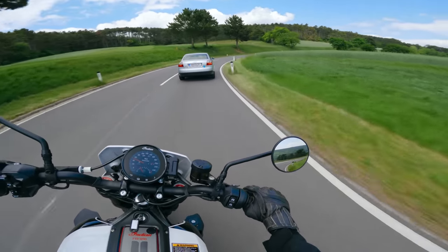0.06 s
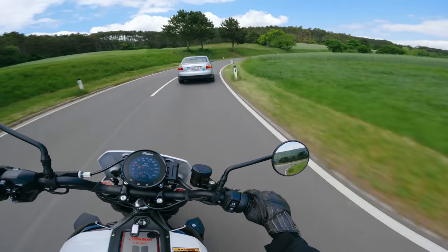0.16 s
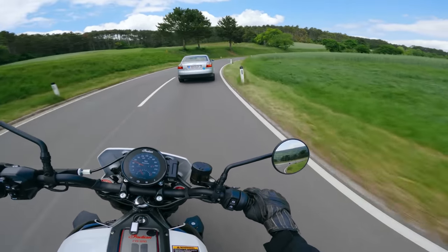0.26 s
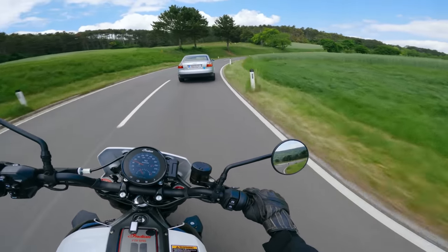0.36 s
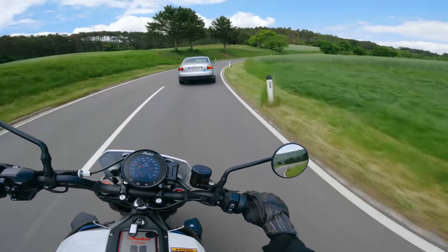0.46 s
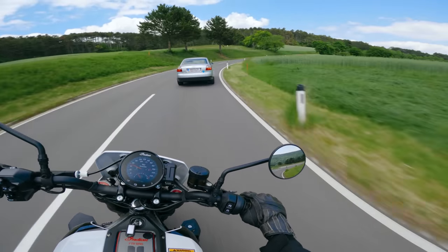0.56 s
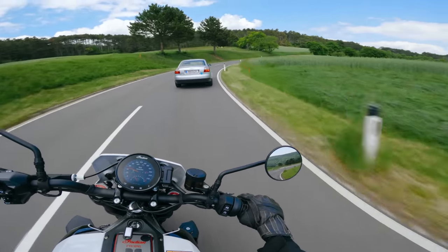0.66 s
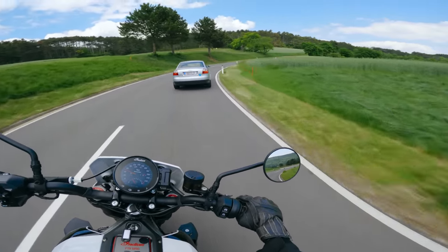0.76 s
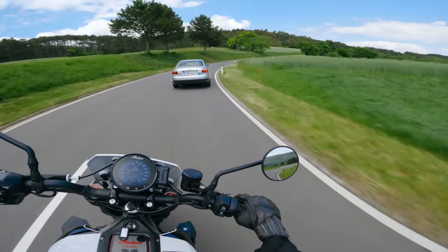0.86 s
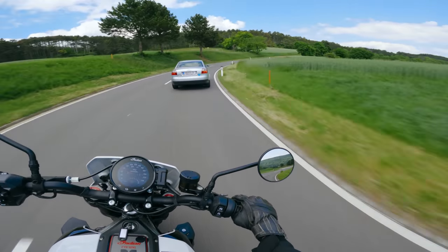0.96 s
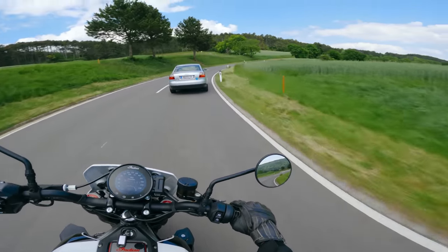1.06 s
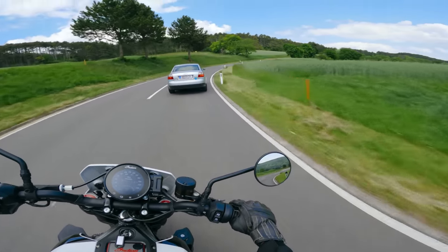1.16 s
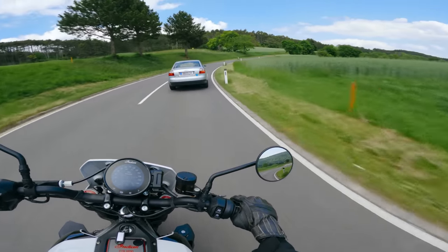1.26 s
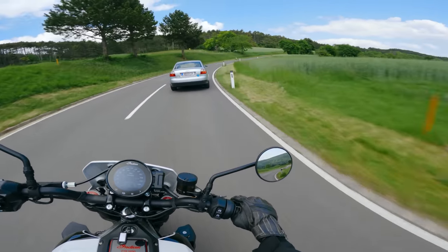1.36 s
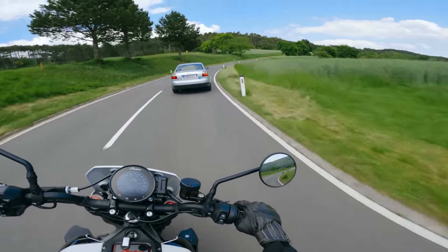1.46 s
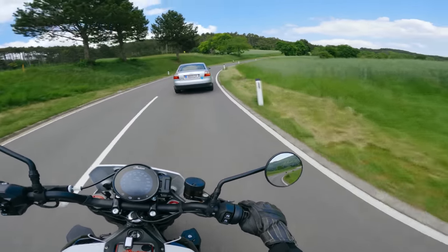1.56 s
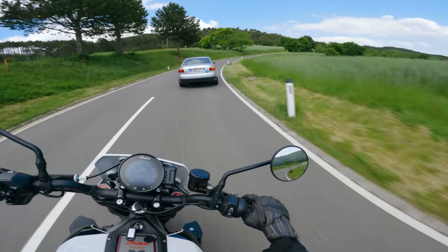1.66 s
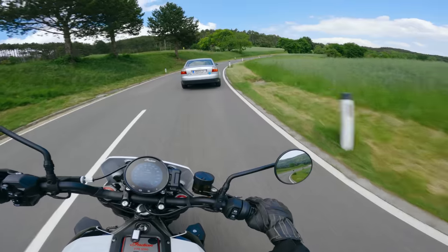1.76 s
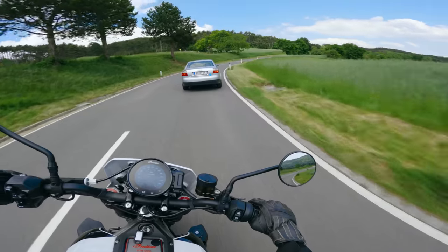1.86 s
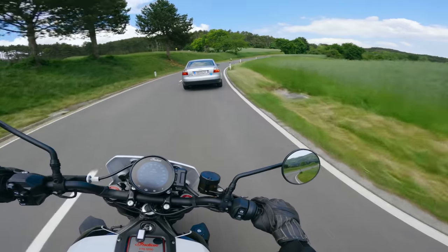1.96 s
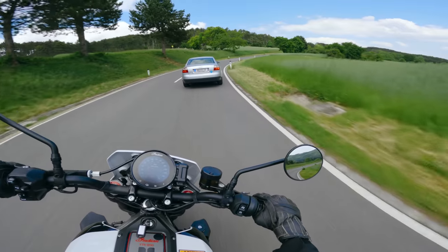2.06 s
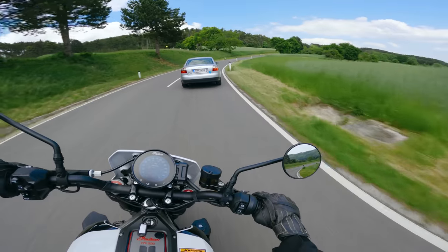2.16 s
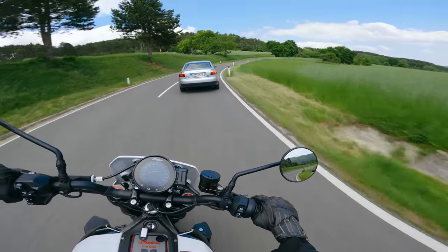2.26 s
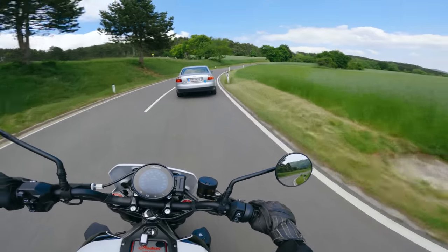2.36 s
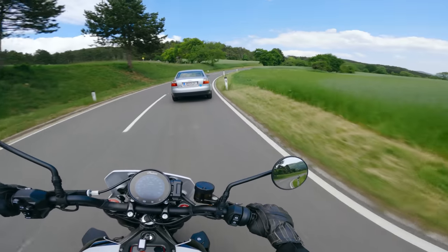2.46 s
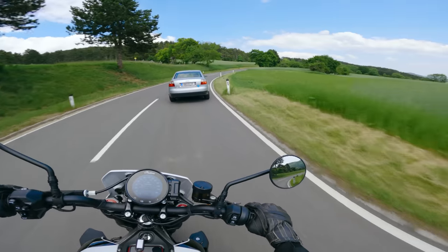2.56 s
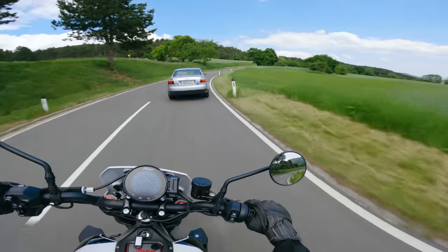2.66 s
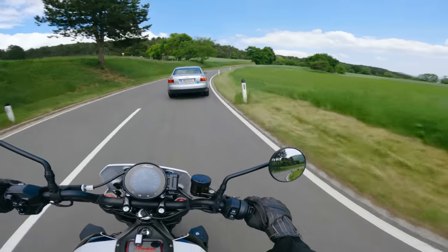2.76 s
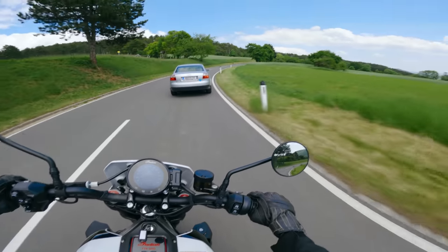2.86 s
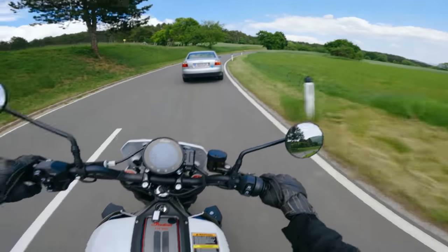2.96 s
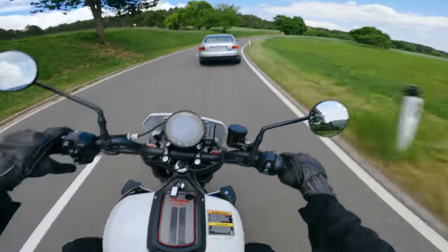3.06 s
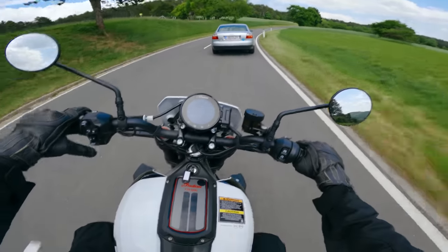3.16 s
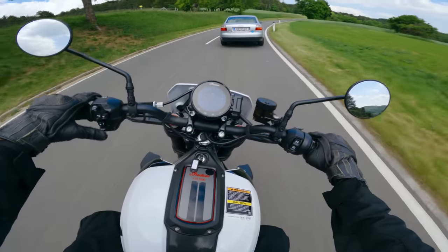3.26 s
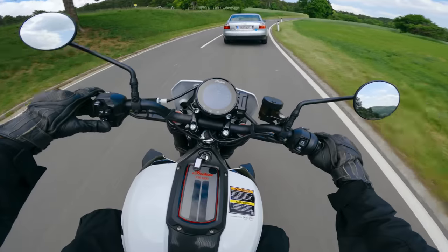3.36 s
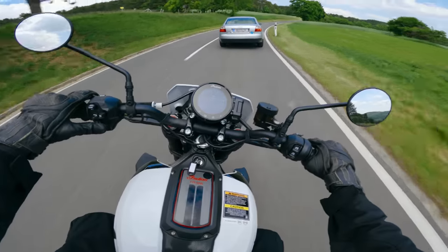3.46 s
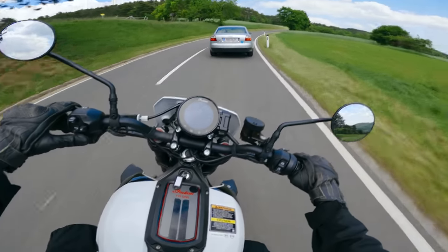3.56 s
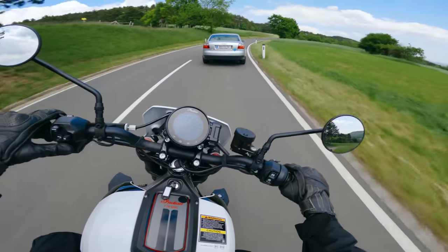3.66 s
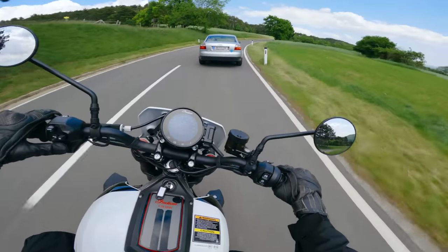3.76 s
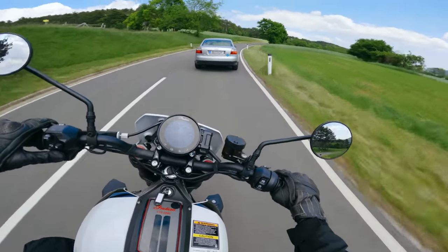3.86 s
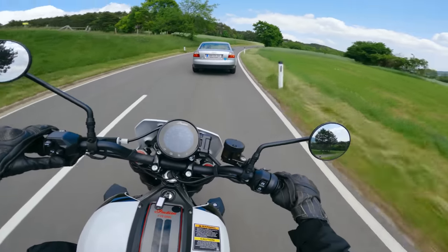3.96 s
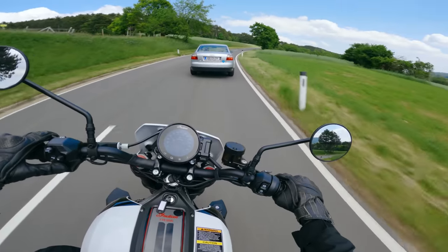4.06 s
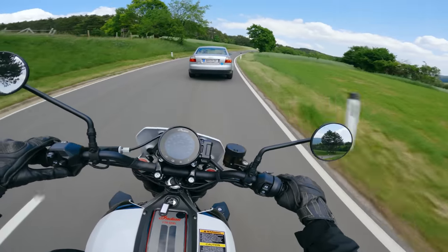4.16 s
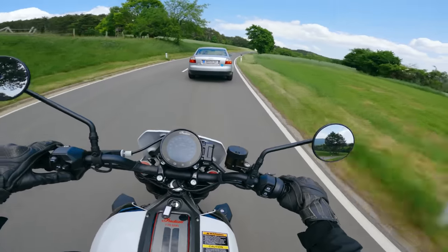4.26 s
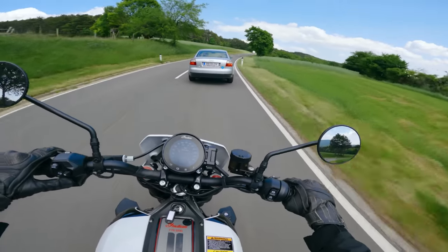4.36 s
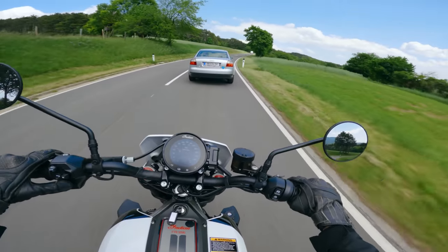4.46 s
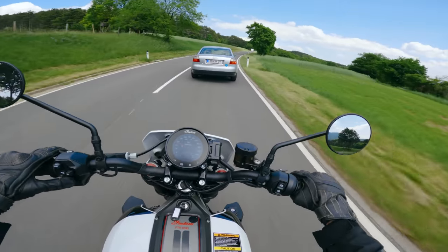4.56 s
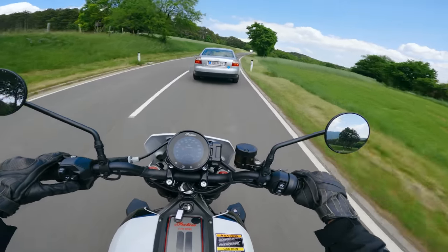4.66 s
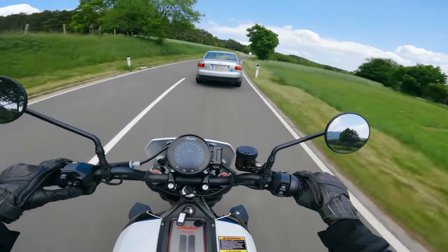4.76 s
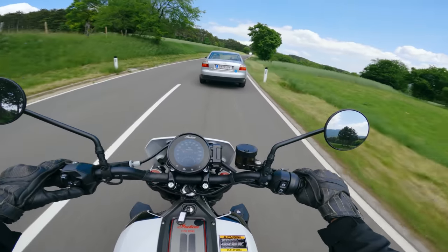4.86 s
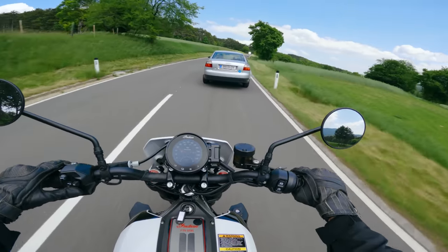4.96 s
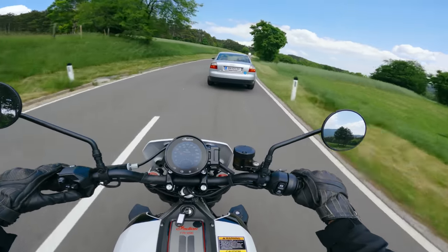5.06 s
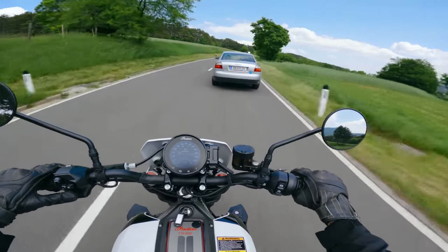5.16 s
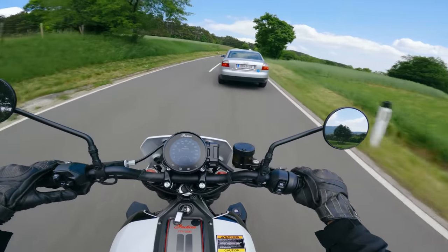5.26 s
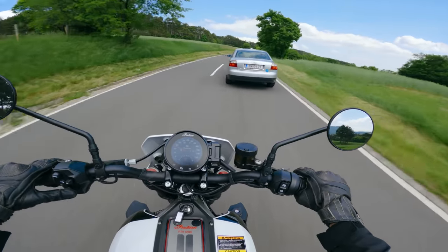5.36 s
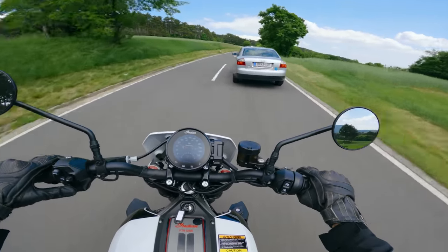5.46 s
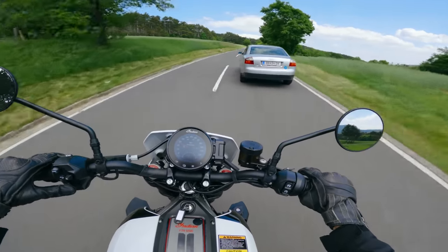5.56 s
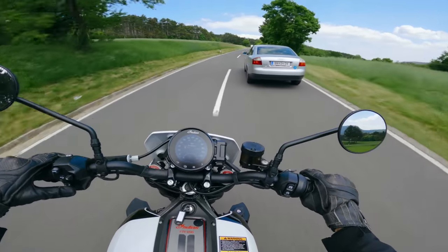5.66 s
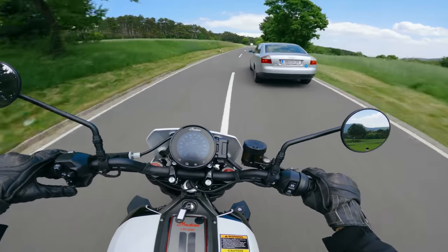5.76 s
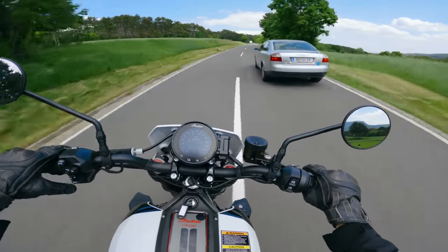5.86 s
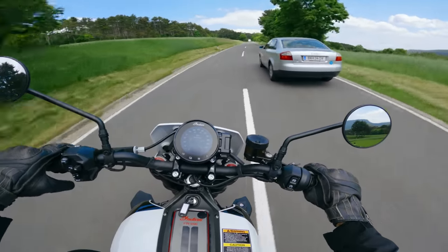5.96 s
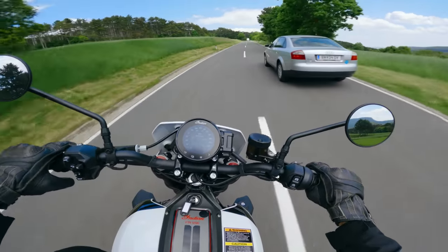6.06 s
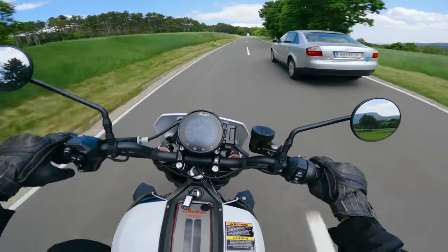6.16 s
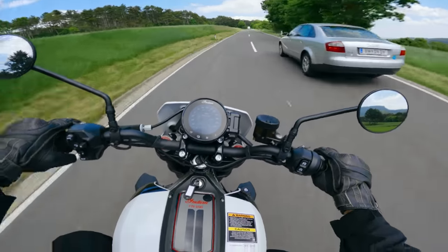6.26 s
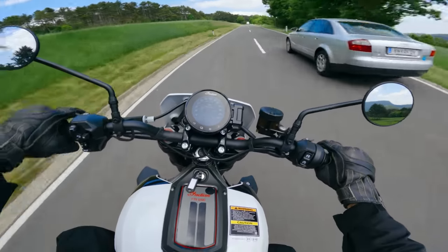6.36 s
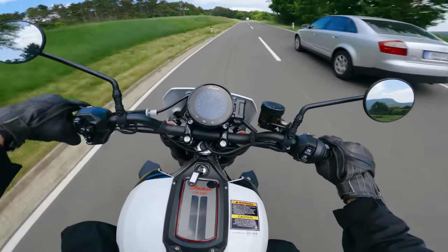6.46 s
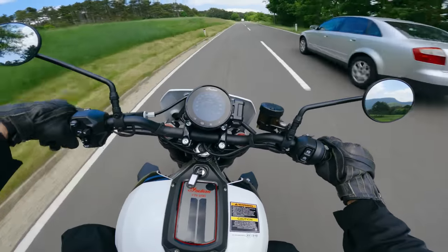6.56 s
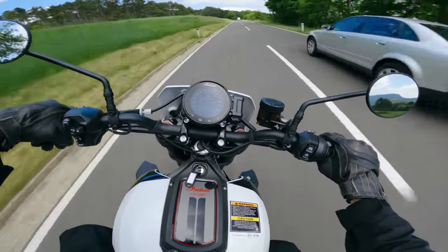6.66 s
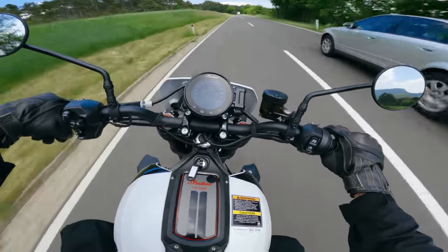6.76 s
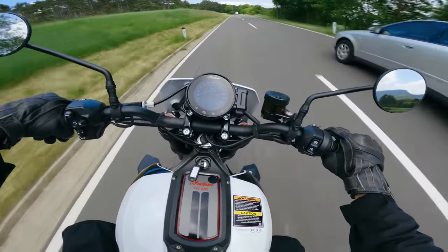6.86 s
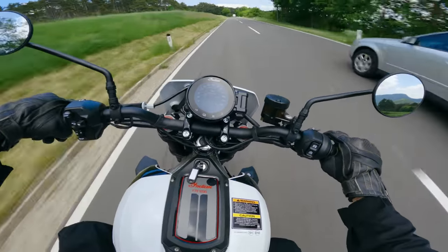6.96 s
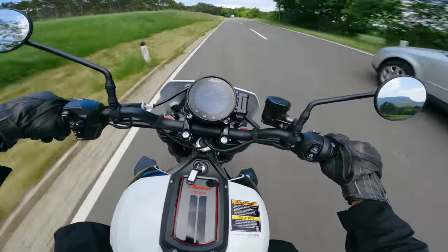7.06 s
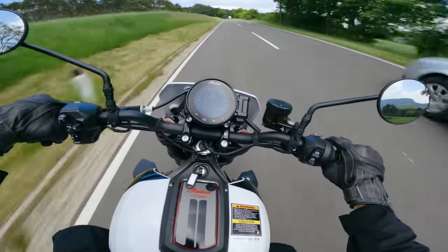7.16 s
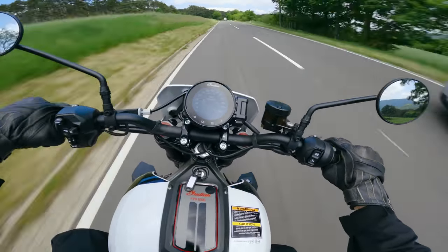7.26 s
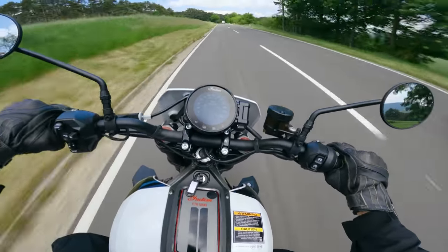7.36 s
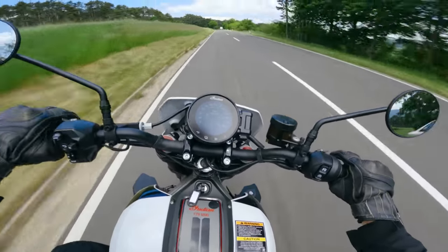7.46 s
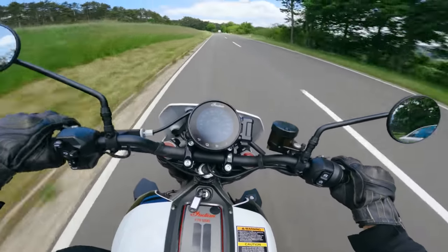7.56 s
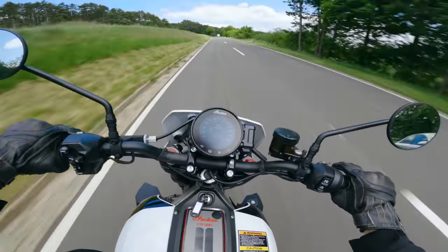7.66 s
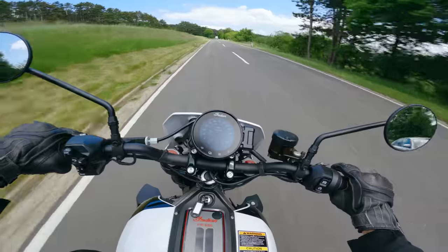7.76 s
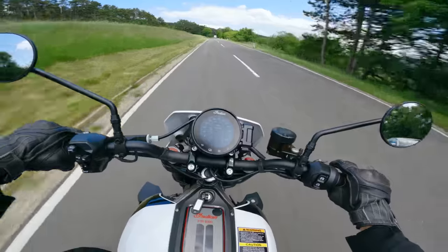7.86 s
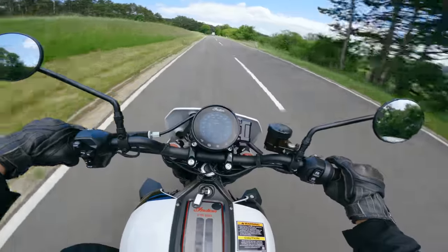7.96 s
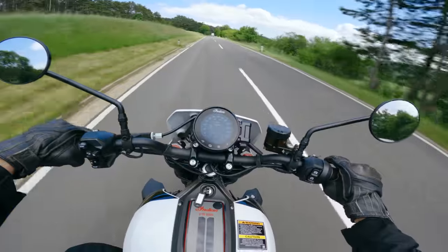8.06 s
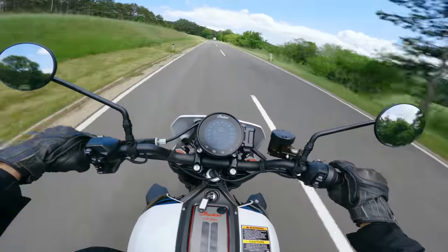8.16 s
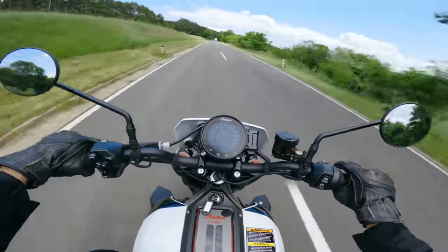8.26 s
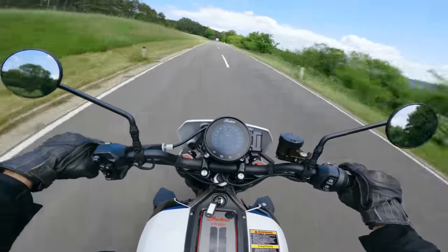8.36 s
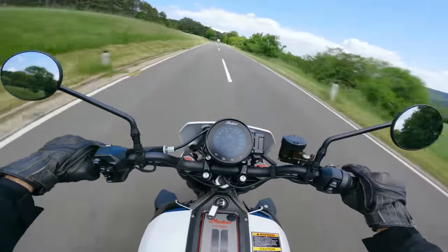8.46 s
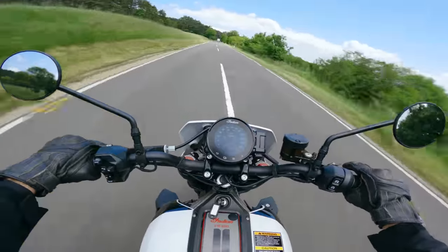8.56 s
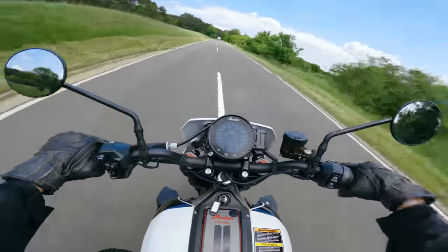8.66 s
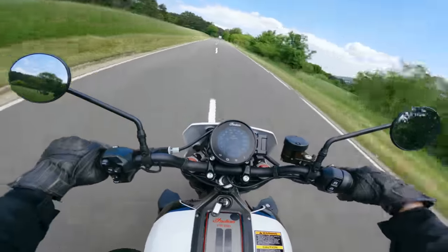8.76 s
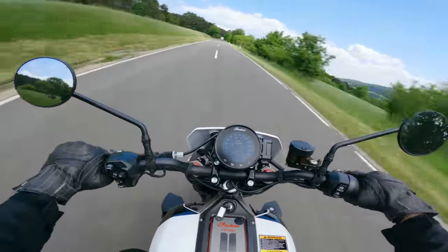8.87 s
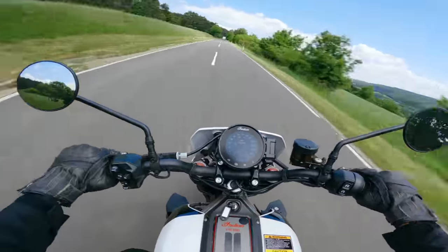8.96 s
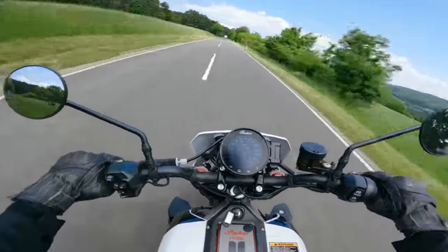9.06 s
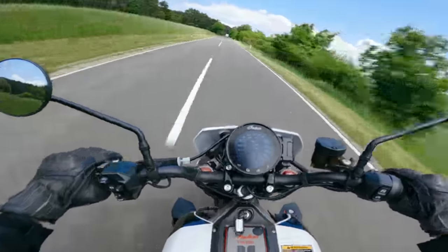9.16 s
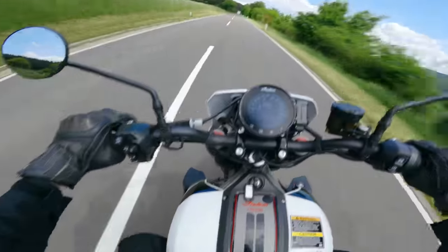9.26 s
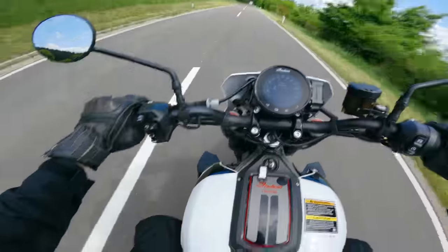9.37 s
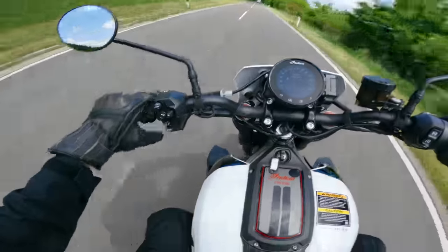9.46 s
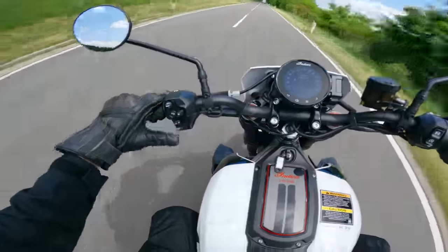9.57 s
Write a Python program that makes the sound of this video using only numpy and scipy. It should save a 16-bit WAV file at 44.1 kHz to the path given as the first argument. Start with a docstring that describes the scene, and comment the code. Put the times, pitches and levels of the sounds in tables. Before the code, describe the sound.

A steady, lumpy motorcycle engine hums and clatters on an open road, recorded on the bike, close and dry. After about five seconds it pulls, with tiny loose metal clinks, then a rising, rougher exhaust boom as it overtakes a car. Wind drops briefly alongside the car, then rumbles harder. Finally the power cuts, a dull gear-shift clunk lands, and the engine resumes at lower revs.

```python
"""A parallel-twin motorcycle is heard from the rider's chest: it cruises, pulls up through the revs and changes up.
Unevenly spaced firings boom in the pipes as sums of sine waves, and spit a short noisy rasp at wide throttle.
Ticks and gas noise ring the engine casings; gears whine, intake air whistles and a loose part clinks.
The gearbox knocks at the gear change, and wind noise buffets the microphone harder as the speed grows."""
import sys
import numpy as np
from scipy import signal
from scipy.fft import rfft, irfft
from scipy.io import wavfile
from scipy.ndimage import uniform_filter1d, minimum_filter1d

SR = 44100
rng = np.random.default_rng(int(sys.argv[2]) if len(sys.argv) > 2 else 0)


def put_to_file(sound):
    """Save the sound as 16-bit audio at rate SR, in the file named by the first command-line argument."""
    columns = np.atleast_2d(sound).T  # one column per channel
    safe = np.clip(columns, -1, 1)
    whole_steps = np.round(safe * 32767)
    wavfile.write(sys.argv[1], SR, whole_steps.astype(np.int16))


N = 424241
TIME = np.arange(N) / SR  # s
FREQ = np.maximum(np.fft.rfftfreq(N, 1 / SR), 1)  # Hz, kept above zero
SECOND_FIRING = 3 / 8  # share of a cycle between the cylinders of a 270 degree crank


def undb(db):
    """Turn decibels into gain."""
    return 10 ** (np.asarray(db) / 20)


def unit(x):
    """Scale a sound to a standard deviation of 1."""
    return x / np.std(x)


def curves(table):
    """Join the columns of a table by straight lines in time."""
    s, *columns = np.transpose(table)
    return [np.interp(TIME, s, column) for column in columns]


def colour(points):
    """Turn (frequency [Hz], level [dB]) points into a gain for every frequency."""
    hz, db = np.transpose(points)
    return undb(np.interp(np.log(FREQ), np.log(hz), db))


def resonance(hz, width):
    """Give the complex response of one resonance, 1 at its centre."""
    return 1 / (1 + 1j * (FREQ ** 2 - hz ** 2) / (FREQ * width))


def shape(x, response):
    """Filter a sound by a frequency response."""
    return irfft(rfft(x) * response, N)


def band_rms(x, lo, hi):
    """Measure the strength of a sound between two frequencies."""
    return np.std(shape(x, (FREQ > lo) & (FREQ < hi)))


def walk(rate):
    """Wander smoothly at random with spread 1, changing about rate times a second."""
    return unit(shape(rng.standard_normal(N), 1 / (1 + (FREQ / rate) ** 4)))


def blend(control, stops, values):
    """Crossfade between values as a control passes their stops."""
    weights = [np.interp(control, stops, row) for row in np.eye(len(stops))]
    return sum(weight * value for weight, value in zip(weights, values))


def dip(s, half_length):
    """Draw a smooth bell in time, 1 at its centre."""
    return np.exp(-((TIME - s) / half_length) ** 2)


def loading(throttle):
    """Load on the engine: 0 up to cruising, 1 when it pulls."""
    return np.interp(throttle, [.3, .7], [0, 1])


def loudness(law, hz, throttle):
    """Level in dB: it grows with the throttle and swells where the engine fills its cylinders best."""
    shut_db, open_db, peak_db, peak_hz, width_hz = law
    torque_peak = np.exp(-((hz - peak_hz) / width_hz) ** 2)
    return shut_db + open_db * throttle + peak_db * torque_peak


def after_firings(turns, length):
    """Jump up at both firings of each cycle and die away over length, a share of a cycle."""
    return sum(np.exp(-((turns - start) % 1) / length) for start in (0, SECOND_FIRING))


def order_gains(tone):
    """Gains of the first 21 multiples of the cycle rate, with unit power from the third up."""
    gains = undb(np.interp(np.arange(1, 22), *np.transpose(tone), right=-36))
    return gains / np.sqrt(np.sum(gains[2:] ** 2) / 2)


def exhaust(turns, hz, throttle, scatter_db=0.2, flutter=0.036, timing=0.003, pipe_hz=155, merge_hz=220,
            silencer_hz=112, silencer_width_hz=22, overtone_hz=345, idle_width_hz=45, load_width_hz=230):
    """Two uneven firings a cycle ring the pipes; load and revs decide which multiples come through."""
    # exhaust tone in each running state: (multiple of the cycle rate, relative level [dB])
    overrun = [(1, -12), (2, -1), (3, 1), (4, 5.5), (5, -15), (6, -18.5), (7, -12.5), (8, -4), (10, -14.5),
               (15, -27)]
    cruising = [(1, -40), (2, -18.5), (3, -12), (4, -5), (5, 2), (6, -11.5), (7, -0.5), (8, -13.5),
                (9, -17.5), (10, -21), (11, -26.5), (12, -14), (13, -16.5), (14, -13), (15, -19),
                (16, -23.5), (17, -18.5), (18, -22), (19, -24), (20, -33.5), (21, -30.5)]
    lugging_tone = [(1, -41.5), (2, -21.5), (3, -10.5), (4, -7.5), (5, 0), (6, -9.5), (7, -3), (8, -15),
                    (9, -4), (10, -10), (11, -7.5), (12, -1), (13, -15), (14, -8.5), (15, -12.5)]
    part_throttle = [(1, -22.5), (2, -15.5), (3, -16), (4, -9), (5, 3), (6, -16), (7, -13.5), (8, -10.5),
                     (9, -12), (10, -23.5), (11, -37), (12, -13.5), (13, -32), (14, -32.5), (15, -19.5)]
    low_revs = [(1, -34.5), (2, -6.5), (3, -6), (4, -23.5), (5, 1), (6, -11.5), (7, -32.5), (8, -16),
                (9, -15.5), (10, -9), (11, -16.5), (12, -20), (13, -18.5), (14, -22), (15, -25)]
    mid_revs = [(1, -35.5), (2, 1), (3, -1.5), (4, -5), (5, 6.5), (6, -48), (7, -7.5), (8, -4.5), (9, -5.5),
                (10, -3), (11, -11), (12, -5), (13, -42), (14, -11), (15, -26)]
    high_revs = [(1, -15), (2, 3.5), (3, -0.5), (4, 0.5), (5, -2.5), (6, -4), (7, 0.5), (8, -8), (9, -7.5),
                 (10, -35), (11, -9), (12, -15.5), (13, -19), (14, -24), (15, -23)]
    # cycle rates of lugging and part throttle: (rate [Hz])
    part_open_hz = [26.5, 38.4]
    # cycle rates of low, mid and high revs with the throttle wide open: (rate [Hz])
    wide_open_hz = [32.7, 38.4, 43.8]

    tones = (overrun, cruising, lugging_tone, part_throttle, low_revs, mid_revs, high_revs)
    states = [order_gains(tone) for tone in tones]
    turns = turns + timing * walk(10)  # no two burns are alike
    load = loading(throttle)
    # strong flow damps the pipe: throb turns into bark
    width = idle_width_hz + (load_width_hz - idle_width_hz) * load
    second_pulse = 0.75 + 0.23 * load
    out = 0
    for k, (shut, cruise, lugging, part, *wide) in enumerate(zip(*states), 1):
        order_hz = k * hz
        part_open = np.interp(hz, part_open_hz, [lugging, part])
        wide_open = np.interp(hz, wide_open_hz, wide)
        gain = blend(throttle, [0, .3, .7, 1], [shut, cruise, part_open, wide_open])
        pair = np.angle(1 + second_pulse * np.exp(-2j * np.pi * k * SECOND_FIRING))
        # at light load the two firings merge in the bass
        pair = pair * (1 - (1 - load) / (1 + (order_hz / merge_hz) ** 8))
        # the pipe resonance draws out each pulse
        lag = 2 * np.arctan((order_hz ** 2 - pipe_hz ** 2) / (order_hz * width))
        # at light load its overtone rings on too, and the silencer rounds it into one thump
        lag += (1 - load) * (np.pi + 2 * np.arctan((order_hz - overtone_hz) / idle_width_hz))
        lag += (1 - load) * 2 * np.arctan((order_hz - silencer_hz) / silencer_width_hz)
        wave = np.cos(2 * np.pi * k * turns + pair - lag)
        out = out - gain * (1 + flutter * walk(9.9)) * wave
    return out * undb(scatter_db * walk(39))


def firing_rasp(turns, throttle, rasp_hz=2550, width_hz=800, length=0.081, rasp_db=-2.5):
    """Every firing spits a short burst of noise, strongest with the throttle wide open."""
    bursts = after_firings(turns, length) * rng.standard_normal(N)
    rasp = unit(shape(bursts, resonance(rasp_hz, width_hz) ** 2))
    return rasp * throttle ** 3 * undb(rasp_db)


def valve_gear(turns, count=64, scatter_db=3, slop_s=.0001):
    """Ticks come at the same crank angles in every cycle, each a little different in size and timing."""
    cycles = np.arange(int(turns[-1]))[:, None]
    angles = (np.arange(count) + rng.random(count)) / count
    at = np.interp(cycles + angles, turns, TIME)
    at = at + slop_s * rng.standard_normal(at.shape)
    size = rng.choice([-1, 1], count) * undb(scatter_db * rng.standard_normal(at.shape))
    samples = np.clip(at * SR, 0, N - 1).astype(int)
    return unit(np.bincount(samples.ravel(), size.ravel(), N))


def clatter(turns, throttle, clatter_db, hiss_db, puff_length=0.21, idle_puff=0.42, load_puff=0.35,
            gas_db=0, spit_db=1.5, crack=0.56, crack_length=0.0091):
    """Ticks and gas noise swell after each firing and ring the casings; the open intake changes their colour."""
    # colour of the noise from the casings: (frequency [Hz], relative level [dB])
    casings = [(290, -26.5), (500, -1.5), (568, -7), (602, -8.5), (684, -4), (745, -10.5), (922, -2),
               (1050, -13), (1110, -8.5), (2170, -21), (2390, -22.5), (4050, -33), (4740, -32.5),
               (6570, -43), (15000, -61)]
    # its colour with the intake open: (frequency [Hz], relative level [dB])
    intake = [(310, -11.5), (520, -4.5), (599, -12), (660, -6.5), (771, -8.5), (939, -4), (1080, -8.5),
              (1330, -8.5), (1820, -20), (2700, -27.5), (4230, -31.5), (4730, -30.5), (5150, -37),
              (8790, -48.5), (15000, -65)]
    # ringing covers and fins: (frequency [Hz], width [Hz], level over the broad colour [dB])
    covers = [(570.6, 15, -0.5), (703, 39, -6.5), (930, 170, -6.5), (1353, 180, -9.5), (1626, 23, 0.5),
              (1784, 13, -2.5), (2174, 54, -1.5), (2690, 580, -15), (3850, 28, -4.5), (4566, 36, 6),
              (4810, 110, 3.5), (5600, 710, -0.5)]

    load = loading(throttle)
    puff = after_firings(turns, puff_length)
    swell = 1 + (idle_puff + load * load_puff) * puff * undb(spit_db * walk(60))
    swell = swell / np.sqrt(uniform_filter1d(swell ** 2, size=4410))  # even out over 0.1 s
    ticks = shape(valve_gear(turns), colour([(400, 6.5), (1500, -2), (4000, -7.5), (12000, 0.0)]))
    drive = swell * (ticks + undb(gas_db) * rng.standard_normal(N))

    ringing = sum(undb(db) * resonance(hz, width) for hz, width, db in covers)
    light = shape(drive, colour(casings) * (1 + ringing))
    heavy = shape(drive, colour(intake) * (1 + .9 * ringing))

    # under load each firing begins with a crack
    edge = 1 + crack * load * after_firings(turns, crack_length)
    edge = edge / np.sqrt(uniform_filter1d(edge ** 2, size=4410))
    treble_share = 1 / (1 + (2100 / FREQ) ** 6)
    out = 0
    for sound, weight in ((light, 1 - load), (heavy, load)):
        body = shape(sound, 1 - treble_share) / band_rms(sound, 600, 1800)
        hiss = shape(sound, treble_share) / band_rms(sound, 2500, 8000)
        out = out + weight * (body * undb(clatter_db) + edge * hiss * undb(hiss_db))
    return out


def whine(turns, waver_db=3):
    """Gear teeth and cam chain sing at fixed multiples of the engine speed, wavering a little."""
    # gear and chain notes: (multiple of the cycle rate, relative level [dB])
    teeth = [(24, -9), (27, -12.5), (35, -20), (40, -20.5)]
    out = 0
    for k, db in teeth:
        gain = undb(db + waver_db * walk(0.7))
        out = out + gain * np.sin(2 * np.pi * k * turns + 1.5 * walk(2.8))
    return out


def whistle(throttle, window=0.24):
    """Air sings in the gap of the throttle plates; each note has its own best opening."""
    # notes: (frequency [Hz], width [Hz], level against the clatter [dB], throttle at which it sings best)
    notes = [(938.6, 20, -7, .3), (2430, 80, -21, .64), (3380, 71, -33, .65)]
    out = 0
    for hz, width, db, opening in notes:
        song = unit(shape(rng.standard_normal(N), resonance(hz, 1.4 * width) ** 2))
        out = out + song * undb(db) * np.exp(-((throttle - opening) / window) ** 2)
    return out


def gearbox(thud_hz=190, thud_s=0.0026, click_s=0.0028, ring_hz=950, ring_s=0.031):
    """The shift drum knocks, the dogs engage and the clutch cover rings: short sines and noise that die away."""
    # gearbox knocks: (time [s], thud level [dB], click level [dB], ring level [dB])
    knocks = [(9.021, -0.5, -12.5, -45), (9.078, -12, -41, -26)]
    click_colour = colour([(300, 0), (1200, 3.5), (2500, -16), (5500, -23), (11000, -38), (15000, -42)])
    click_noise = unit(shape(rng.standard_normal(N), click_colour))
    out = 0
    for s, thud_db, click_db, ring_db in knocks:
        age = np.maximum(TIME - s, 0)
        thud_swell = (age / thud_s) * np.exp(1 - 1.13 * age / thud_s)
        click_swell = (age / click_s) * np.exp(1 - 1.5 * age / click_s)
        out = out - undb(thud_db) * np.sin(2 * np.pi * thud_hz * age) * thud_swell
        out = out + undb(click_db) * click_noise * click_swell
        out = out + undb(ring_db) * np.sin(2 * np.pi * ring_hz * age) * np.exp(-age / ring_s)
    return out


def clinks(ring_hz=1630, ring_s=0.0063):
    """Engine shake taps a loose part, which rings briefly as a fading sine."""
    # a loose metal part clinks as the load comes on: (time [s], level [dB])
    taps = [(4.812, -38), (4.894, -35), (4.975, -33), (5.018, -38), (5.14, -36), (5.22, -37), (5.3, -38)]
    out = 0
    for s, db in taps:
        age = np.maximum(TIME - s, 0)
        out = out + undb(db) * np.sin(2 * np.pi * ring_hz * age) * np.exp(-age / ring_s)
    return out


def wind(hz, gust_db=0.9, gust_hz=3.1, base_db=-27.5, base_hz=23.7, db_per_doubling=12.5):
    """Eddies tumble over the microphone in gusts, harder as the road speed grows."""
    # colour of the wind on the microphone: (frequency [Hz], relative level [dB])
    buffet = [(15, -21.5), (30, -13.5), (55, -1.5), (85, 5), (130, -3.5), (190, -5.5), (260, -12),
              (350, -6.5), (500, -23), (1000, -49.5), (4000, -80)]
    # the wind drops behind a car, alongside it and briefly at the gear change:
    # (time [s], half length [s], change [dB])
    lulls = [(5.044, .6, -3.5), (6.897, 0.32, -10.5), (9.075, .1, -8)]
    # the bike rolls on through the gear change; speed is 1 where the cycle rate is base_hz
    speed = np.maximum.accumulate(hz) / base_hz
    db = base_db + db_per_doubling * np.log2(speed) + gust_db * walk(gust_hz)
    db = db + sum(depth * dip(s, length) for s, length, depth in lulls)
    return unit(shape(rng.standard_normal(N), colour(buffet))) * undb(db)


def scene():
    """Engine speed and throttle drive the machine and the wind, while knocks and clinks come at set times."""
    # engine speed while cruising and pulling: (time [s], four-stroke cycle rate [Hz])
    revs = [(0.0, 22.87), (1.11, 23.48), (1.69, 23.45), (2.65, 23.22), (4.07, 24.04), (4.45, 23.97),
            (4.93, 23.95), (5.55, 25.83), (5.99, 28.27), (6.54, 32.04), (7.25, 36.57), (7.58, 38.46),
            (8.53, 44.64), (8.7, 45.44)]
    # engine speed through the gear change, falling and then caught by the clutch: (time [s], cycle rate [Hz])
    gear_change = [(8.759, 44.79), (9.0, 35.25), (9.08, 32.66), (9.2, 39.65), (9.25, 37.76), (9.62, 38.94)]
    # throttle: (time [s], opening: 0 shut, 0.3 cruising, 0.7 part open, 1 wide open)
    openings = [(0, 0.24), (4.8, 0.3), (5.55, 0.62), (6.4, 0.99), (8.7, 1), (8.8, .03), (9.05, 0.016),
                (9.2, .68), (9.62, .72)]
    # small slow swells of the engine's level: (time [s], boom [dB], rasp [dB])
    swells = [(0, 1.9, 3.1), (1, 1.5, .8), (2.4, 0.7, 0.7), (3.2, -0.3, -0.1), (4, 0.4, -0.1),
              (4.55, -0.8, -2), (5.8, 0.5, 2), (6.8, 0, -.6), (7.7, -0.5, 0.3), (9.62, -1.4, 0.3)]
    # the boom falls as the throttle snaps shut, between the gears and as the clutch bites:
    # (time [s], half length [s], boom change [dB], rasp change [dB])
    power_cuts = [(8.792, 0.034, -22, 1), (9.068, 0.042, -8, -4.5), (9.164, 0.05, -3, -4.5)]
    # loudness of boom, clatter and hiss: (throttle shut [dB], added wide open [dB],
    # added at the torque peak [dB], cycle rate of that peak [Hz], its half width [Hz])
    boom_law = (-19.5, 3.5, 5.5, 37, 8)
    clatter_law = (-38.5, 6.5, 5.5, 36.5, 10)
    hiss_law = (-56.5, 7.5, 4.5, 38.5, 9)

    hz, = curves(list(revs) + list(gear_change))
    throttle, = curves(openings)
    turns = np.cumsum(hz) / SR  # engine cycles so far
    boom_swell, rasp_swell = curves(swells)
    boom_cut = sum(db * dip(s, length) for s, length, db, _ in power_cuts)
    rasp_cut = sum(db * dip(s, length) for s, length, _, db in power_cuts)
    boom_db = loudness(boom_law, hz, throttle) + boom_swell + boom_cut
    clatter_db = loudness(clatter_law, hz, throttle) + rasp_swell + rasp_cut
    hiss_db = loudness(hiss_law, hz, throttle) + rasp_swell + rasp_cut
    whine_db = clatter_db - 3.5 * loading(throttle)  # against the clatter, it sinks back under load

    pipes = exhaust(turns, hz, throttle) * undb(boom_db)
    machine = clatter(turns, throttle, clatter_db, hiss_db)
    machine = machine + whine(turns) * undb(whine_db)
    machine = machine + firing_rasp(turns, throttle) * undb(hiss_db)
    air = whistle(throttle) * undb(clatter_db) + wind(hz)
    return (pipes + machine + air + clinks() + gearbox())[None]


def record(dry, ceiling=.78, top_hz=15700, edge_s=.003):
    """A limiter ducks for a few milliseconds around the highest peaks; the top is cut and the ends are eased."""
    room = np.minimum(1, ceiling / (np.abs(dry) + 1e-9))
    gain = uniform_filter1d(minimum_filter1d(room, size=221), size=221)  # 221 samples = 5 ms
    gain = gain * np.minimum(1, np.minimum(TIME, TIME[::-1]) / edge_s)
    low_pass = signal.ellip(8, .2, 70, top_hz, fs=SR, output="sos")
    return signal.sosfilt(low_pass, dry * gain)


dry = scene()
out = record(dry)
put_to_file(out)
```